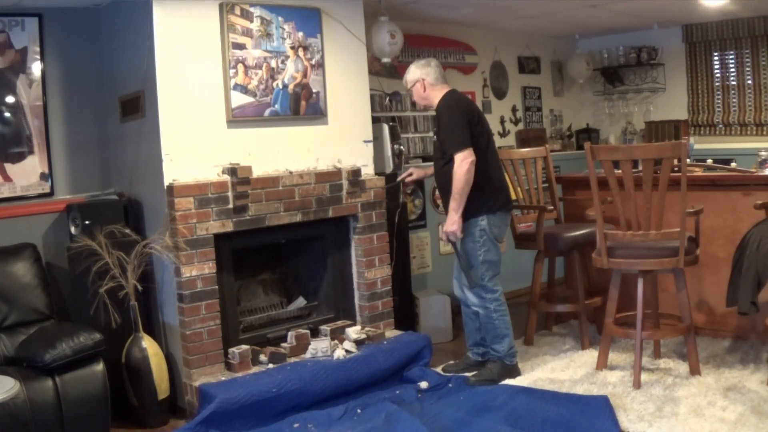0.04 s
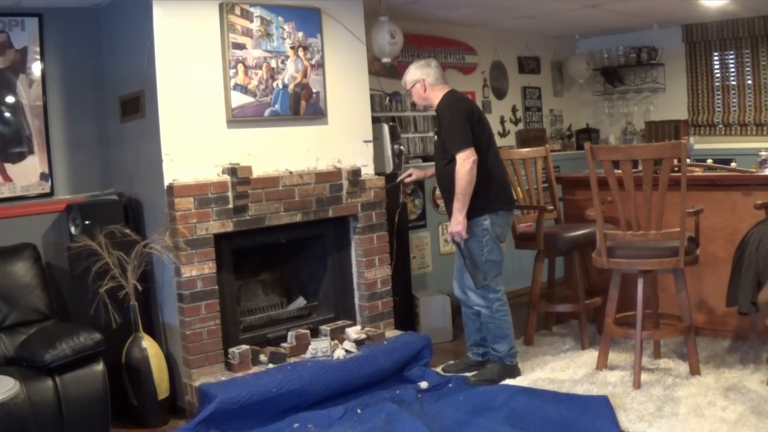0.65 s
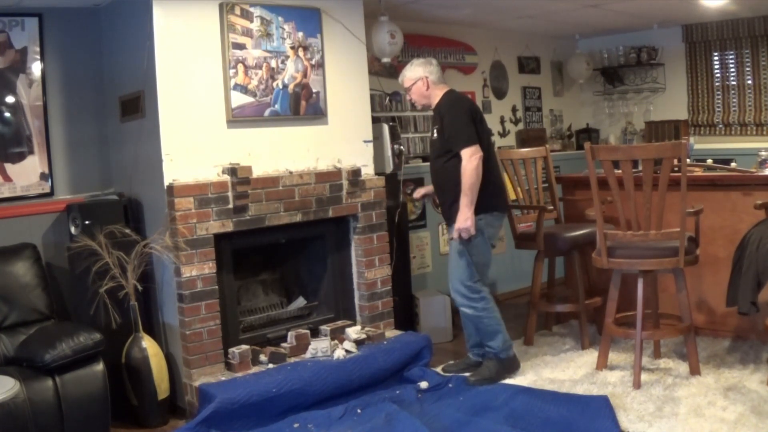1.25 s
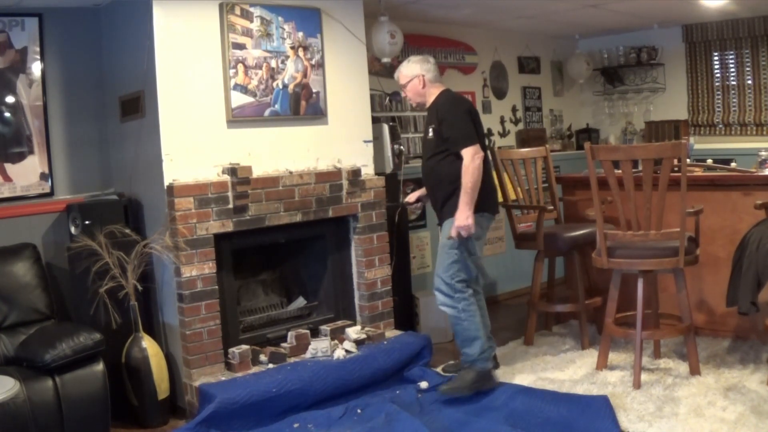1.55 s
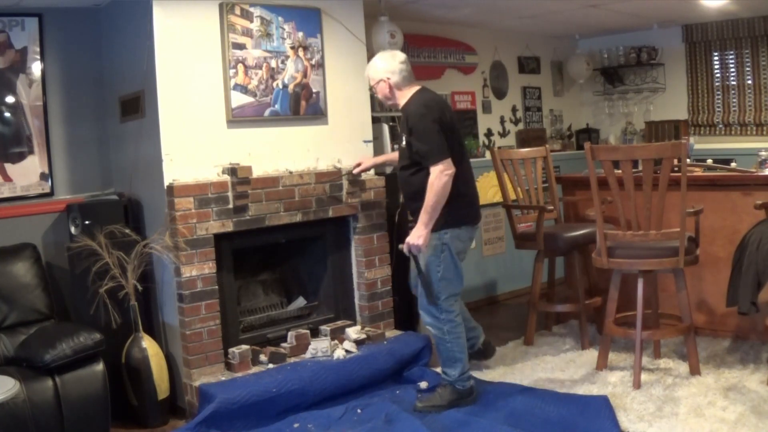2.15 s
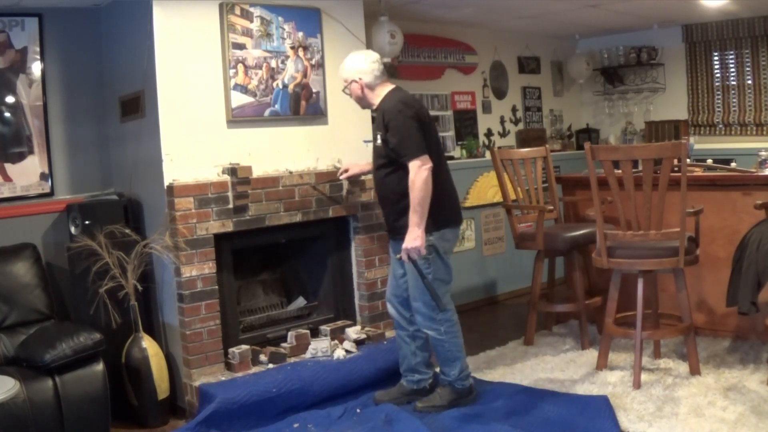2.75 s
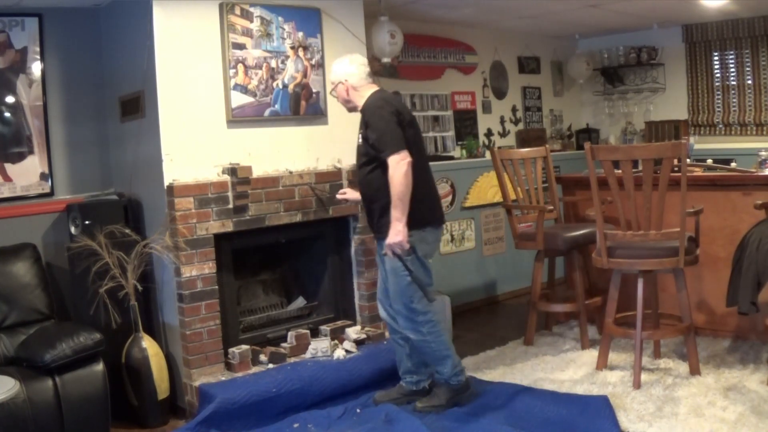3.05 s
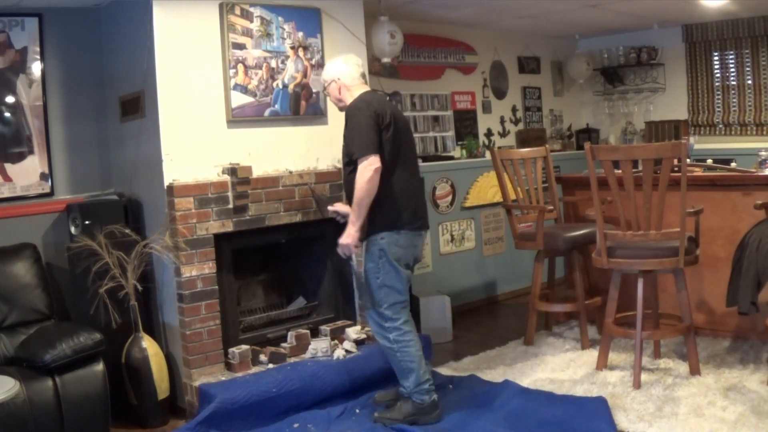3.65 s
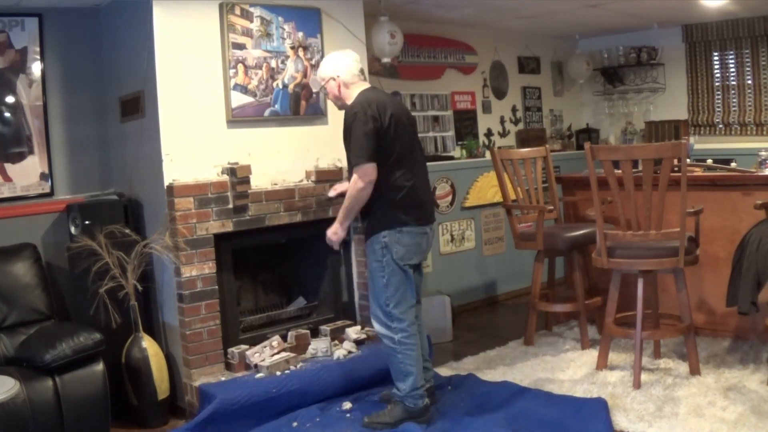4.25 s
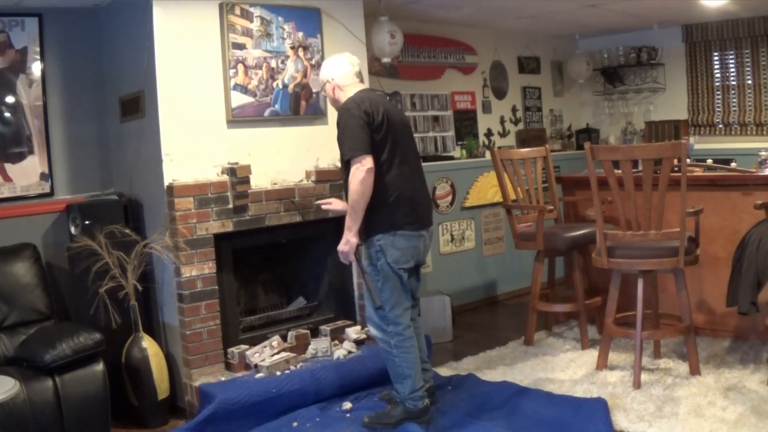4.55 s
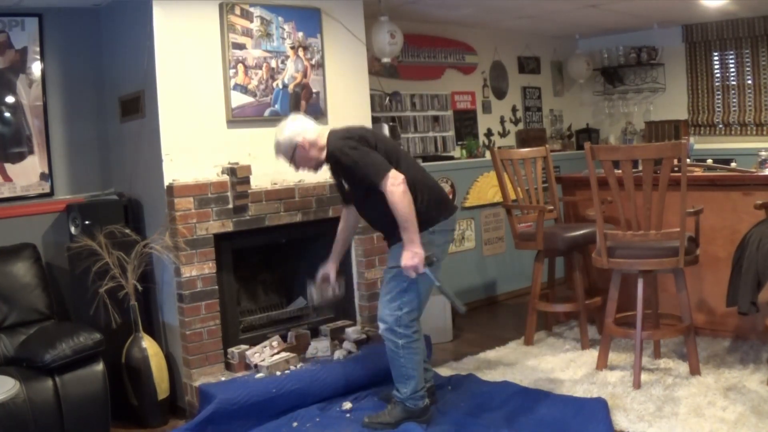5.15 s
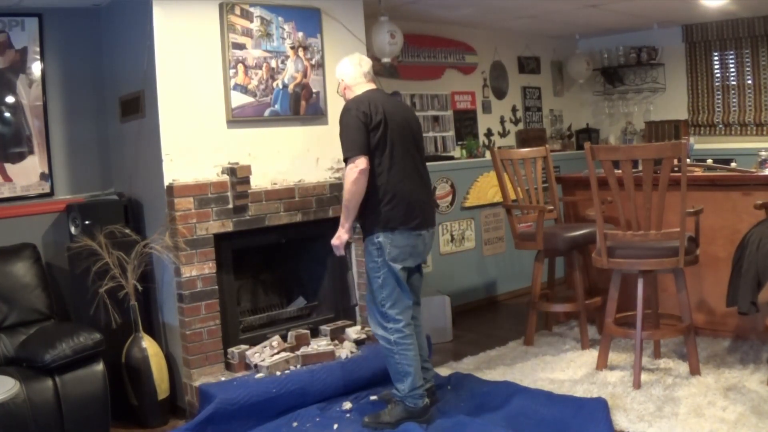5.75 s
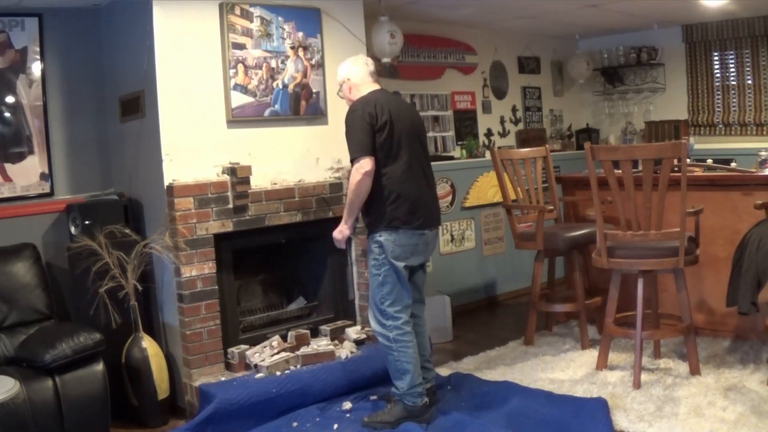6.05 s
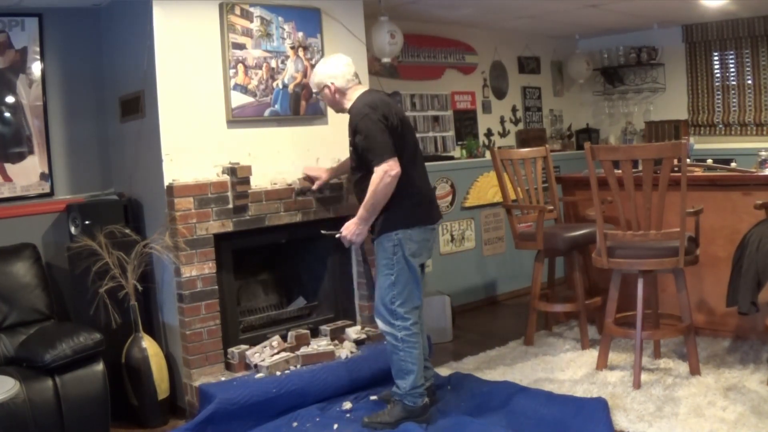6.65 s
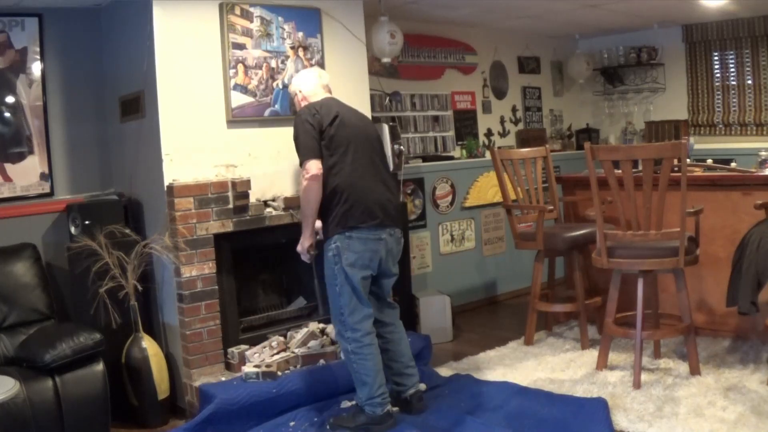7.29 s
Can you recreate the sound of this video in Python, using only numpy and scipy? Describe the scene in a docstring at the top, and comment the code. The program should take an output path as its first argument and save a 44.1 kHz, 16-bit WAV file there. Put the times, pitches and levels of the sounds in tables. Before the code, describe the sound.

A steel bar pries old bricks off a fireplace in a furnished room. In the first second, mortar cracks and crumbles, bricks clink and knock on each other, and the hearth takes three heavy thuds, with a short echo and a lingering low rumble. From about 1 to 2.4 seconds there is only soft room hiss and the faint, fast ticking of a tiny motor, both of which continue throughout. Sharp clinks on brick follow, then more gritty cracking, with a heavy thud and falling brick at 3.5 seconds and brief rings of the bar.

From 4 seconds the work is sped up: short, dry scrapes, clacks and knocks without echo, differing between left and right. Bricks land loudest near 4.9, 5.3 and 7 seconds. The gritty scraping and clinking grows busiest from about 5.5 to 7.3 seconds, ending with a small scrape around 7.5 seconds.

```python
"""A steel bar levers old bricks off a fireplace in a furnished room. The bar clinks, mortar cracks and
crumbles into grains, bricks knock on each other and the heavy hearth thuds. Behind the work are a soft
room hiss, a low rumble and the faint fast ticking of a tiny motor. From about 4 s on the work rushes by,
sped up: each contact is a short swell with no echo, different in the left and right ear."""
import sys
import numpy as np
from scipy import signal
from scipy.fft import rfft, irfft, next_fast_len
from scipy.io import wavfile

SR = 44100
rng = np.random.default_rng(int(sys.argv[2]) if len(sys.argv) > 2 else 0)


def file_out(sig):
    """Save sig as 16-bit WAV at sys.argv[1]."""
    # one column per channel
    cols = np.atleast_2d(sig).T
    # limit, then scale
    lim = np.clip(cols, -1, 1)
    pcm = np.round(lim * 32767).astype(np.int16)
    wavfile.write(sys.argv[1], SR, pcm)


N = 331632
TIME = np.arange(N) / SR
SPAN = np.arange(2 ** 14) / SR  # time inside one contact
SPAN_HZ = np.fft.rfftfreq(len(SPAN), 1 / SR)
MIDDLE = SPAN[-1] / 2
RUSH_S = 4.022  # the work is sped up from here on
MEDIUM_DB = -35  # a contact of medium strength

# the tone of a knocking brick, strongest at 400 Hz: f/Hz, level/dB
KNOCK = [(130, -29.5), (215, 3), (400, 6.5), (750, -6), (1150, -35.5)]


def undb(db):
    """Turn decibels into a gain."""
    return 10 ** (np.asarray(db) / 20)


def unit(x):
    """Scale to an average power of 1."""
    return x / np.sqrt(np.mean(x ** 2, axis=-1, keepdims=True))


def burst(x, db):
    """Give a short sound the energy of 10 ms at this level."""
    return unit(x) * undb(db) * np.sqrt(.01 * SR / x.shape[-1])


def add(track, s, x):
    """Mix x into the track from time s on."""
    i = int(s * SR)
    x, i = x[..., max(-i, 0):], max(i, 0)
    track[..., i:i + x.shape[-1]] += x[..., :N - i]


def response(points, size=len(SPAN)):
    """A filter through (f/Hz, level/dB) points, falling steeply beyond both ends."""
    hz, db = np.transpose(points)
    octave = np.log2(np.maximum(np.fft.rfftfreq(size, 1 / SR), 1))
    outside = np.abs(octave - np.clip(octave, np.log2(hz[0]), np.log2(hz[-1])))
    gain = undb(np.interp(octave, np.log2(hz), db) - 20 * np.minimum(outside, 2))
    # make the filter ring only after a hit, never before it
    cepstrum = irfft(np.log(gain), size)
    cepstrum[1:size // 2] *= 2
    cepstrum[size // 2 + 1:] = 0
    return np.exp(rfft(cepstrum))


def ring(x, body):
    """Pass x through a filter."""
    return irfft(rfft(x) * body, x.shape[-1])


def noise(points):
    """Steady noise shaped by (f/Hz, level/dB) points."""
    size = next_fast_len(N, True)
    return unit(ring(rng.standard_normal(size), response(points, size))[:N])


def ticking(scatter_s, db, rate_hz=29.97):
    """A tiny motor ticks nearby; each tick drops in pitch and rings briefly."""
    t = SPAN[:2 ** 10]
    hz = 3130 + 650 * np.exp(-t / 0.0028)
    shape = np.exp(-((t - .004) / 0.0014) ** 2) + 0.5 * np.exp(-((t - .008) / 0.0033) ** 2)
    tick = shape * np.sin(2 * np.pi * np.cumsum(hz) / SR)
    out = np.zeros(N)
    for s in np.arange(.0052, TIME[-1] - .02, 1 / rate_hz):
        add(out, s + scatter_s * rng.random(), tick * undb(db + 0.5 * rng.standard_normal()))
    return out


def background():
    """Room hiss, rumble and ticks; once sped up, the rumble is gone and each ear hears its own noise."""
    # the steady hiss and hum of the room: f/Hz, level/dB
    room_tone = [(22, -28), (90, 2.5), (300, -6), (520, -12.5), (3000, -20), (9800, -25.5), (15500, -30.5)]
    # a low rumble lingers after the heavy blows: t/s, level/dB
    rumble_levels = [(0, -47.5), (.55, -48.5), (.95, -47.5), (1.2, -56), (1.6, -69), (2.8, -68), (3.2, -59),
                     (3.9, -57)]
    side = undb(-65) * noise([(200, -4.5), (700, -1), (7000, -15), (14000, -49)]) * np.array([[1], [-1]])
    rumble = noise([(27, -3), (40, 4.5), (55, 1), (110, -4.5), (650, -22)])
    rumble *= undb(np.interp(TIME, *np.transpose(rumble_levels)))
    plain = undb(-58) * noise(room_tone) + side + rumble + ticking(scatter_s=0.00066, db=-53)
    rushed = [undb(-59) * noise(room_tone) + ticking(scatter_s=0.0034, db=-55.5) for _ in range(2)]
    return np.where(TIME < RUSH_S, plain, rushed)


def room(x):
    """Direct sound plus a short echo from the walls; the bass is alike in both ears."""
    # the echo by band: f/Hz, time to fade 60 dB/s, direct share, share of echo that differs between ears
    bands = [(108, 0.56, 0.59, 0.00022), (362, 0.38, 0.31, 0.0067), (870, 0.33, 0.72, 0.15),
             (2220, 0.24, 0.57, 0.31), (11700, 0.64, 0.98, 0.023)]
    t = np.arange(2 ** 15) / SR
    pitch = np.log(np.maximum(np.fft.rfftfreq(len(t), 1 / SR), 1))
    centres = np.log([row[0] for row in bands])
    echo = 0
    for (_, fade_s, direct, apart), own in zip(bands, np.eye(len(bands))):
        share = np.interp(pitch, centres, own)  # neighbouring bands fade into each other
        tail = rng.standard_normal((2, len(t))) * undb(-60 * t / fade_s)
        mid, side = (z * np.sqrt(share / np.average(np.abs(z) ** 2, weights=share)) for z in rfft(tail))
        walls = np.sqrt(1 - apart) * mid + np.sqrt(apart) * side * np.array([[1], [-1]])
        echo = echo + np.sqrt(direct) * share + np.sqrt(1 - direct) * walls
    lead = 64  # samples kept ahead of the direct sound
    impulse = np.roll(irfft(echo), lead, axis=1)[:, :-2 ** 12]
    return signal.fftconvolve(x, impulse, axes=1)[:, lead:lead + N]


def resonance(hz, width_hz, lift_db):
    """A filter that makes one note stand out."""
    return 1 + undb(lift_db) / (1 + 2j * (SPAN_HZ - hz) / width_hz)


def notes(count, width_hz, lift_db):
    """A filter that makes several random notes stand out, closer together low down."""
    return 1 + sum(resonance(hz, width_hz, lift_db) - 1 for hz in 500 + 13000 * rng.random(count) ** 2)


def grains(spread_db, channels=1):
    """Dense mortar grains: mostly tiny, a few large."""
    shape = (channels, len(SPAN))
    size_db = spread_db * np.minimum(rng.exponential(size=shape), 4)
    return unit(rng.choice([-1, 1], shape) * undb(size_db))


def swell(width_s):
    """A level that rises and falls evenly around the middle of a contact."""
    return 1 / np.cosh(np.clip((SPAN - MIDDLE) / width_s, -20, 20))


def brick(bodies, crumble_s, hz, knock_db, clink_db, grit_db):
    """Crumbling grains push on one brick: it knocks, clinks on its own note and sprays grit."""
    knock, clink, grit = bodies
    build_up = 1 - np.exp(-SPAN * 0.4 / crumble_s ** 2)  # a long crumble also starts more slowly
    force = grains(spread_db=3) * np.exp(-SPAN / crumble_s) * build_up
    force = ring(force, notes(count=10, width_hz=68, lift_db=-2))
    note = resonance(hz, width_hz=200, lift_db=4)
    flakes = notes(count=4, width_hz=1200, lift_db=-3)
    # a clean tap on whole brick has duller grit than bursting mortar
    dulling = undb(-.9 * max(clink_db - grit_db, 0) * np.log2(np.maximum(SPAN_HZ / 5000, 1)))
    parts = (knock, knock_db), (clink * note, clink_db), (grit * flakes * dulling, grit_db)
    return sum(burst(ring(force, body), db) for body, db in parts)


def rush(effort, *parts):
    """One swell of grains with the comb-like, ringing colour of sped-up sound; parts: filter, level/dB."""
    catch = undb(np.repeat(2.14 * rng.standard_normal(2 ** 7), 2 ** 7))  # brick catches and slips
    comb_colour = np.abs(notes(count=26, width_hz=110, lift_db=7))
    force = ring(grains(spread_db=4.5, channels=2) * catch * effort, comb_colour)
    return sum(burst(ring(force, np.abs(body)), db) for body, db in parts)  # abs: all parts peak together


def hearth_thuds(thud, light_thud, knock):
    """The heavy hearth takes the weight with a thud and a softer knock; returns (plain, rushed)."""
    # blows on the hearth: t/s, level/dB
    blows = [(0.127, -29.5), (0.437, -26.5), (0.738, -29.5), (2.796, -40), (3.041, -37), (3.318, -37),
             (3.498, -23.5), (3.565, -30.5), (4.719, -37.5), (4.87, -24.5), (5.603, -37.5), (6.009, -30),
             (6.206, -38), (6.28, -33), (6.319, -35.5), (6.4, -42), (6.467, -31.5), (7.049, -32),
             (7.261, -36.5)]
    plain, rushed = np.zeros((1, N)), np.zeros((2, N))
    for s, db in blows:
        if s < RUSH_S:
            heave = rng.standard_normal((1, len(SPAN))) * SPAN * np.exp(-SPAN / 0.013)
            add(plain, s, burst(ring(heave, thud), db) + burst(ring(heave, knock), db - 11))
        else:
            add(rushed, s - MIDDLE, rush(swell(width_s=0.0097), (light_thud, db), (knock, db - 10)))
    return plain, rushed


def falling_bricks(bodies, light_thud):
    """Loose bricks land on others, each size knocking at its own pitch; returns (plain, rushed)."""
    # landings: t/s, f/Hz, level/dB
    landings = [(0.112, 404, -38.5), (0.19, 497, -40), (0.288, 500, -41.5), (0.421, 646, -25.5),
                (0.757, 490, -36.5), (3.066, 327, -42), (3.349, 423, -38), (3.5, 430, -31.5),
                (3.56, 300, -39.5), (4.449, 420, -46.5), (4.578, 425, -35), (4.634, 400, -36.5),
                (4.719, 340, -35.5), (4.868, 363, -22), (5.257, 430, -26.5), (6.368, 600, -42.5),
                (6.42, 330, -39), (6.853, 560, -34.5), (7.049, 553, -25)]
    _, clink, grit = bodies
    plain, rushed = np.zeros((1, N)), np.zeros((2, N))
    for s, hz, db in landings:
        knock = response([(f * hz / 400, level) for f, level in KNOCK])
        if s < RUSH_S:
            add(plain, s, brick((knock, clink, grit), crumble_s=0.013, hz=hz,
                                knock_db=db, clink_db=db - 7, grit_db=db - 15.5))
        else:
            parts = (light_thud, db - 18.5), (knock, db), (clink, db - 7), (grit, db - 15.5)
            add(rushed, s - MIDDLE, rush(swell(width_s=.0063), *parts))
            # the brick rocks once more before it rests
            add(rushed, s + 0.012 - MIDDLE, undb(-11.5) * rush(swell(width_s=0.014), *parts))
    return plain, rushed


def dragged_bricks(bodies, light_thud, jerk_s=0.033, jerk_db=3.5):
    """In the sped-up work, bricks scrape over rubble in quick jerks."""
    # drags: t of the peak/s, half width/s, level/dB, grit above that level/dB
    drags = [(4.04, 0.011, -49, -5.5), (4.401, 0.02, -41, -7.5), (4.84, 0.027, -38, -5),
             (5.145, 0.012, -39.5, -6), (5.659, 0.013, -43.5, -10.5), (5.985, 0.018, -38.5, 2),
             (6.145, 0.028, -44.5, -6), (6.207, 0.016, -35.5, -3.5), (6.41, 0.013, -36, 1),
             (6.455, 0.02, -37, -5), (6.822, 0.029, -32.5, -1), (7.005, 0.018, -37, -6.5),
             (7.24, 0.025, -39.5, 0), (7.285, 0.019, -33.5, -2), (7.371, 0.022, -37.5, -12),
             (7.518, 0.016, -42, -7.5)]
    knock, clink, grit = bodies
    jerks = undb(jerk_db * np.cos(2 * np.pi * (SPAN - MIDDLE) / jerk_s))
    out = np.zeros((2, N))
    for s, width_s, db, gritty_db in drags:
        parts = (light_thud, db - 12), (knock, db - 10), (clink, db), (grit, db + gritty_db)
        add(out, s - MIDDLE, rush(swell(width_s) * jerks, *parts))
    return out


def brick_taps(bodies):
    """A hard tap on whole brick mostly clinks, with little knock or grit."""
    # taps: t/s, contact time/s, f/Hz, level/dB
    taps = [(0.463, 0.023, 1410, -31), (0.598, 0.053, 1620, -39), (0.757, 0.016, 1930, -30.5),
            (0.87, 0.047, 850, -46.5), (2.432, 0.011, 2500, -41), (2.572, 0.0084, 3840, -32.5),
            (2.64, 0.013, 860, -35), (2.77, 0.015, 875, -44), (2.793, 0.0075, 3780, -23.5),
            (3.023, 0.021, 1950, -34.5), (3.661, 0.044, 3970, -42.5), (3.735, .008, 2240, -35),
            (3.757, 0.0068, 2300, -34.5), (3.83, 0.021, 3860, -40.5)]
    out = np.zeros((1, N))
    for s, contact_s, hz, db in taps:
        add(out, s, brick(bodies, contact_s, hz, knock_db=db - 14, clink_db=db, grit_db=db - 10.5))
    return out


def mortar_cracks(bodies, strain_db=-18.5, crumb_db=-12):
    """Mortar crackles under the strain of the bar, then cracks, and crumbs run down."""
    # cracks: t/s, crumbling time/s, f of the brick/Hz, level/dB, grit above that level/dB
    cracks = [(0.108, 0.023, 3960, -33, 0.5), (0.285, .04, 870, -43, -4.5), (0.333, 0.02, 1230, -36.5, -5),
              (0.355, 0.012, 1230, -25.5, 0.5), (0.417, 0.018, 890, -26.5, -1.5),
              (0.431, 0.01, 4000, -40.5, 13), (0.716, 0.024, 2160, -29, -3.5), (0.925, .027, 855, -52, 6),
              (3.066, 0.022, 4070, -42, 4.5), (3.29, 0.023, 3900, -37, 7.5),
              (3.478, 0.0093, 850, -38.5, 2.5), (3.546, 0.019, 3640, -32, -2),
              (3.583, 0.0074, 3860, -41.5, 5.5)]
    knock, clink, grit = bodies
    treble = np.clip(np.log2(np.maximum(SPAN_HZ, 1) / 6000), 0, 1)
    out = np.zeros((1, N))
    for s, crumble_s, hz, db, gritty_db in cracks:
        fine_grit = grit * undb(0.64 * max(db - MEDIUM_DB, 0) * treble)  # harder cracks make finer grit
        add(out, s, brick((knock, clink, fine_grit), crumble_s, hz,
                          knock_db=db - 9, clink_db=db, grit_db=db + gritty_db))
        strain = grains(spread_db=11) * np.exp(-np.abs(SPAN - MIDDLE) / 0.018) * (SPAN < MIDDLE)
        crumbs = grains(spread_db=9) * SPAN * np.exp(-SPAN / 0.021)
        for start, force, level in (s - MIDDLE, strain, db + strain_db), (s + .03, crumbs, db + crumb_db):
            add(out, start, burst(ring(force, clink), level) + burst(ring(force, grit), level + gritty_db))
    return out


def bar_bites(bodies, light_thud):
    """In the sped-up work, the bar bites into mortar; harder bites are shorter."""
    # bites: t of the peak/s, level/dB, grit above that level/dB
    bites = [(4.449, -42, -0.5), (4.511, -38.5, -4.5), (4.578, -31, -0.5), (4.696, -35, 5), (5.207, -48, 3),
             (5.257, -31.5, -3.5), (5.515, -42.5, -13.5), (5.572, -36, 0.5), (5.602, -47.5, 1.5),
             (5.733, -38, -1), (5.758, -34.5, -2), (5.83, -36, -2.5), (5.919, -36.5, -3.5),
             (6.01, -37.5, 0), (6.253, -28.5, -0.5), (6.286, -40, 0), (6.319, -34.5, -9.5),
             (6.368, -35.5, -0.5), (6.49, -41, -7), (6.693, -30.5, 0), (6.763, -39.5, 0.5),
             (6.853, -36.5, -2.5), (6.893, -32.5, 7), (6.908, -29, -3), (6.936, -29, -2), (7.075, -43, 0),
             (7.32, -38, -11)]
    knock, clink, grit = bodies
    out = np.zeros((2, N))
    for s, db, gritty_db in bites:
        effort = swell(width_s=0.0078 * 2 ** ((MEDIUM_DB - db) / 28))  # 28 dB louder is half as long
        parts = (light_thud, db - 16), (knock, db - 11.5), (clink, db), (grit, db + gritty_db)
        add(out, s - MIDDLE, rush(effort, *parts))
    return out


def steel_bar():
    """The struck bar rings briefly, damped by hand and mortar; returns (plain, rushed)."""
    # strikes on the bar: t/s, level/dB, brightness/(dB per octave)
    strikes = [(2.571, -43, -5), (3.547, -32, 27), (3.736, -33, 9), (3.757, -46, -8), (3.830, -73, 18),
               (5.516, -32, -1.5), (5.828, -36, 46), (5.891, -35, -0.5), (6.086, -44.5, -3),
               (6.319, -35, 21), (6.49, -35, 5.5), (7.291, -34, 3)]
    # the notes the steel rings with: f/Hz, level/dB, time to fade 60 dB/s
    bar_notes = [(1340, -8, 0.4), (2335, -3, 0.13), (2250, 5, 0.087), (2570, -5, 0.028),
                 (3800, -6.5, 0.066), (3990, -13.5, 0.12)]
    hz, db, fade_s = np.transpose(bar_notes)[:, :, None]
    plain, rushed = np.zeros((1, N)), np.zeros((2, N))
    for s, level_db, bright_db in strikes:
        note_db = db + bright_db * np.log2(hz / hz.mean())
        if s < RUSH_S:
            waves = np.sin(2 * np.pi * (hz * SPAN + rng.random(hz.shape)))
            ringing = undb(note_db - 60 * SPAN / fade_s) * waves
            add(plain, s, burst(ringing.sum(axis=0), level_db))
        else:
            # cut so short, the notes blur into a broad clack
            blurred = np.max(undb(note_db) * np.exp(-((SPAN_HZ - hz) / 260) ** 2), axis=0)
            force = rng.standard_normal((2, len(SPAN))) * swell(width_s=0.0047)
            add(rushed, s - MIDDLE, burst(ring(force, blurred), level_db))
    return plain, rushed


def scene():
    """The plain work echoes in the room; the rushed (sped-up) work follows without an echo."""
    # the deep thud of the hearth: f/Hz, level/dB
    thud_tone = [(28, -15), (40, -3.5), (65, -9.5), (115, 2), (190, -12.5), (330, -25.5)]
    # the bright clink of brick: f/Hz, level/dB
    clink_tone = [(550, -17), (850, 2.5), (1050, 0), (2400, 2), (3900, -1), (5500, -29)]
    # the hiss of flying grit: f/Hz, level/dB
    grit_tone = [(2800, -27.5), (4500, -2), (8500, 0.5), (12500, -8), (15500, -21.5)]
    thud, knock, clink, grit = map(response, (thud_tone, KNOCK, clink_tone, grit_tone))
    light_thud = thud * response([(25, -9), (75, 8), (125, -6), (200, 14)])
    bodies = knock, clink, grit
    plain_bar, rushed_bar = steel_bar()
    prying = mortar_cracks(bodies) + brick_taps(bodies)
    plain_falls, rushed_falls = falling_bricks(bodies, light_thud)
    plain_thuds, rushed_thuds = hearth_thuds(thud, light_thud, knock)
    scraping = bar_bites(bodies, light_thud) + dragged_bricks(bodies, light_thud)
    plain = plain_bar + prying + plain_falls + plain_thuds
    rushed = rushed_bar + scraping + rushed_falls + rushed_thuds
    return room(plain) + rushed + background()


def record(dry, top_hz=15900):
    """Cut off the very highest treble."""
    return signal.sosfilt(signal.ellip(10, .2, 70, top_hz, fs=SR, output="sos"), dry)


dry = scene()
out = record(dry)
file_out(out)
```